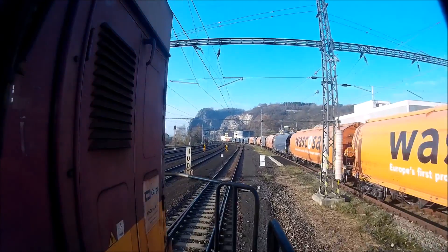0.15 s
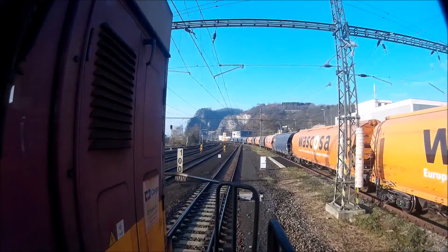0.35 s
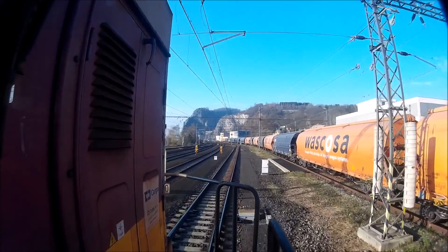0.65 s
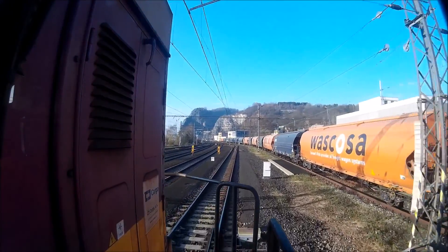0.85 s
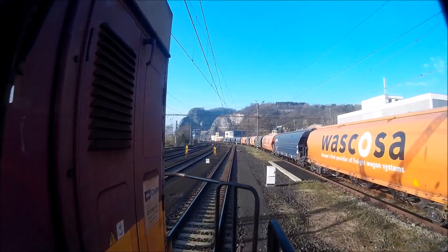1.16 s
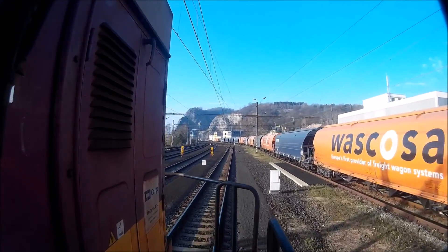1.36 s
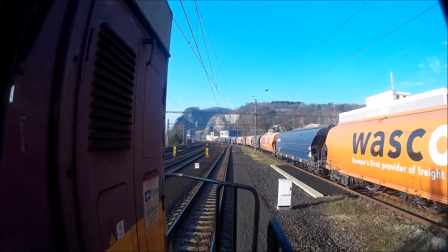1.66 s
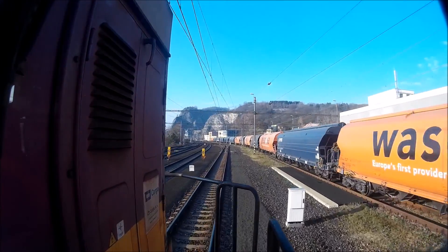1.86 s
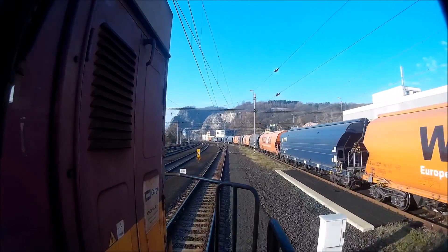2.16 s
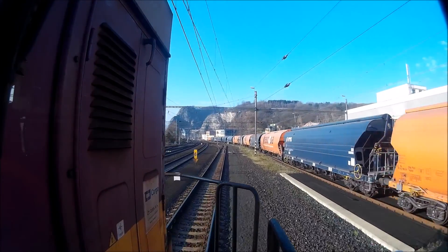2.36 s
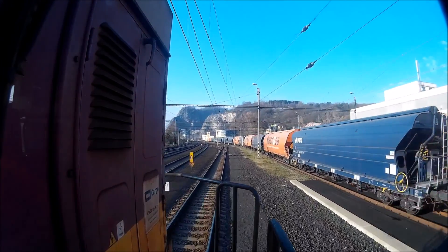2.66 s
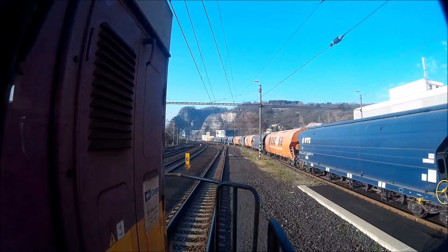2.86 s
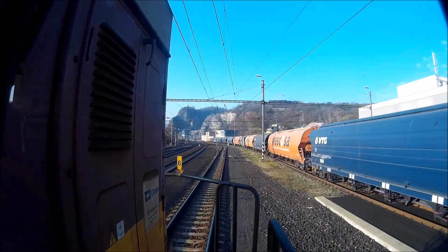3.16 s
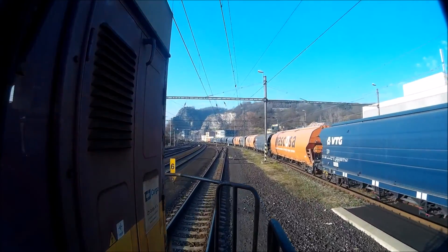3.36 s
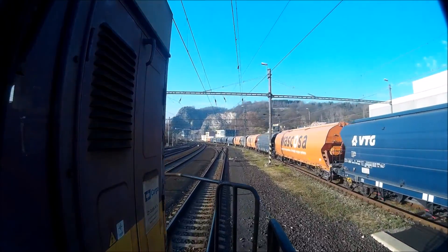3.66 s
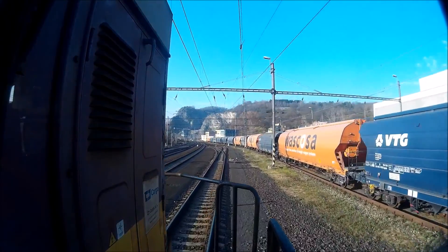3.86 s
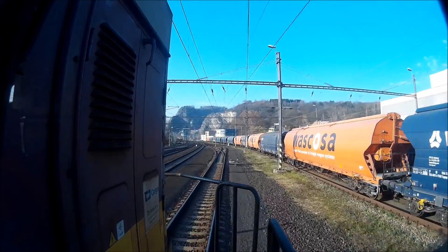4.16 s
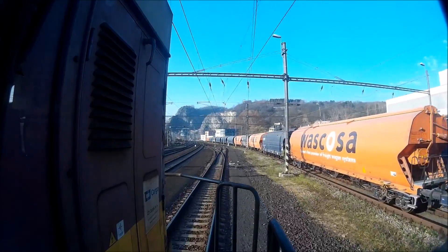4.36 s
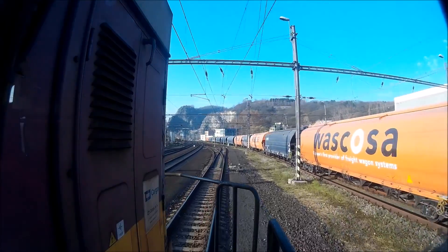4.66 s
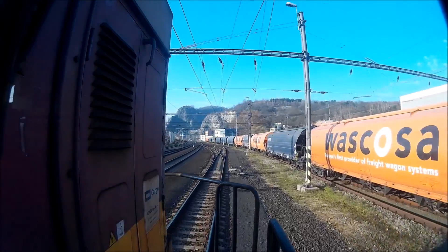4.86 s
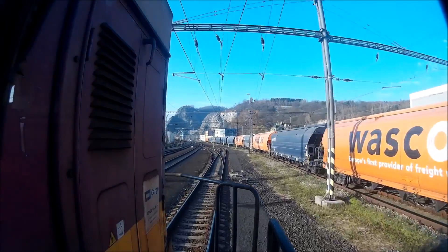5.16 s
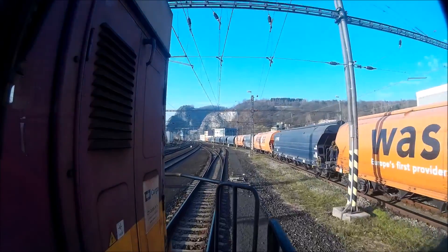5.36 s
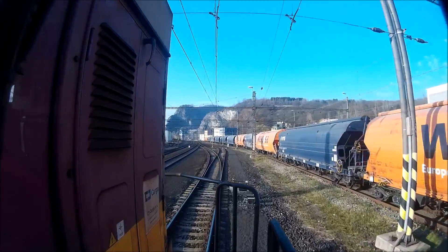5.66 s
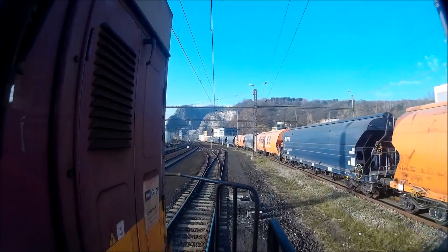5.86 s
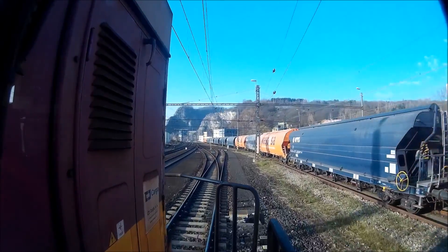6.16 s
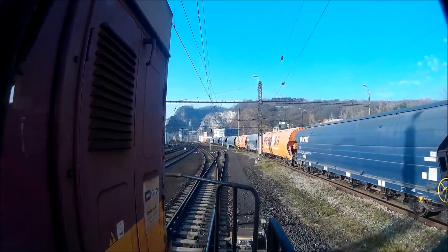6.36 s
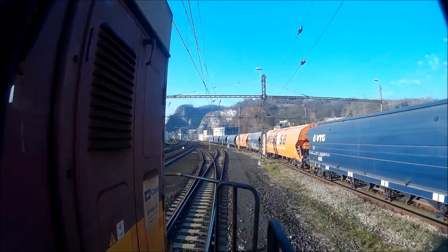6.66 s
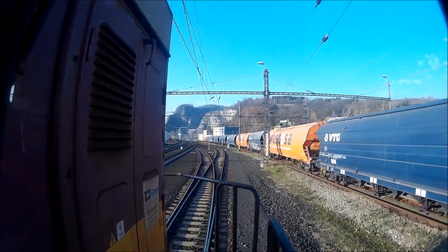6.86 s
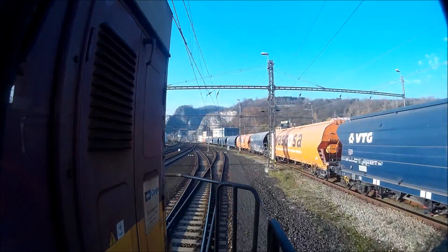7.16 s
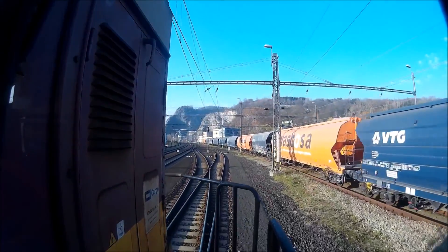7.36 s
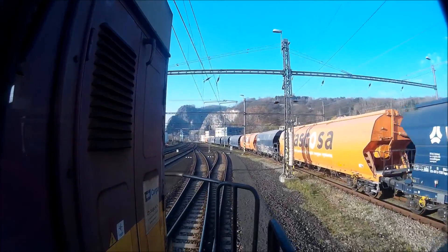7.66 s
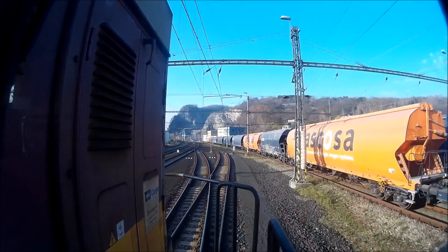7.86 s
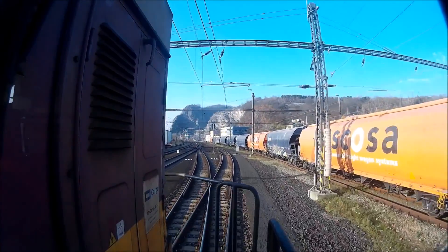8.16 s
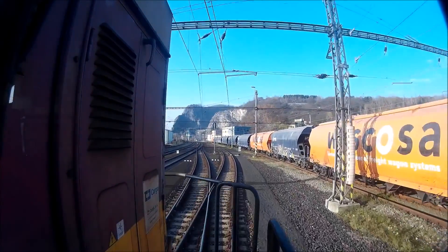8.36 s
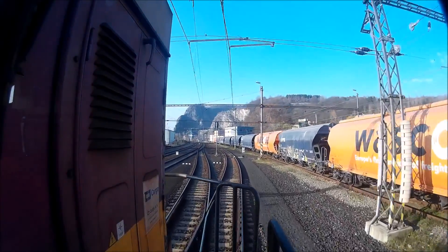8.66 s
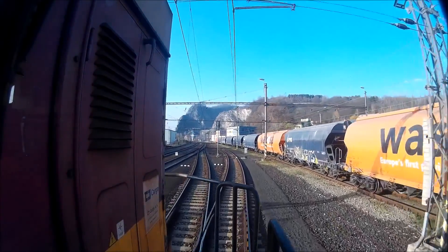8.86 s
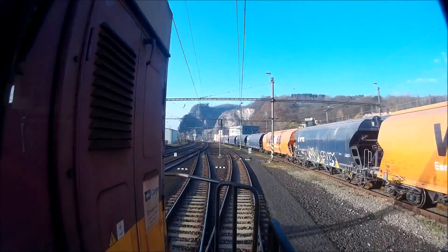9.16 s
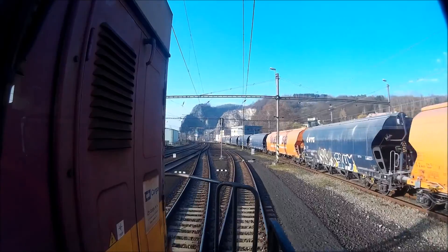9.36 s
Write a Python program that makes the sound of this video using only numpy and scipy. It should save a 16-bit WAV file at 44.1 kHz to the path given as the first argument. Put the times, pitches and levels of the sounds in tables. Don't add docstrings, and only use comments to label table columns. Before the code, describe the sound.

Muffled diesel locomotive drone heard inside a sealed casing, swelling and fluttering with track jolts, with dull rapid knocks, early ticking and faint hiss.

```python
import sys
import numpy as np
from scipy import signal
from scipy.fft import rfft, irfft, next_fast_len
from scipy.io import wavfile
from scipy.ndimage import uniform_filter1d

SR = 44100
rng = np.random.default_rng(int(sys.argv[2]) if len(sys.argv) > 2 else 0)


def materialize(psi):
    bounded = np.clip(np.atleast_2d(psi).T, -1, 1)
    quanta = np.round(bounded * 32767).astype(np.int16)
    wavfile.write(sys.argv[1], SR, quanta)


def amplitude_ratio(level_db):
    exponent = np.asarray(level_db, float) / 20
    return 10 ** exponent


N = 420273
TIME = np.arange(N) / SR

# [start t/s, length/s, level/dB, f/Hz]
TRACK_JOLTS = [(0.065, 0.015, -38, 194.8), (0.111, 0.037, -29, 196), (0.193, 0.034, -34, 193),
               (0.24, 0.028, -31, 190.7), (0.287, 0.086, -38, 191.2), (0.396, 0.019, -33, 191),
               (0.435, 0.033, -37, 187.2), (0.541, 0.023, -31, 193.2), (0.632, 0.022, -34.5, 179),
               (0.675, 0.012, -29, 193.1), (0.714, 0.02, -48, 197.2), (0.773, 0.015, -41, 186.3),
               (0.833, 0.042, -32, 184.6), (0.952, 0.05, -28, 194.7), (1.062, 0.015, -30.5, 190.5),
               (1.128, 0.014, -36, 188.3), (1.149, 0.0089, -31, 190), (1.214, 0.022, -34, 195.6),
               (1.27, 0.053, -33, 192), (1.35, 0.022, -34, 205.4), (1.399, 0.021, -36, 185),
               (1.464, 0.019, -44, 180.5), (1.493, 0.039, -30, 183), (1.572, 0.025, -30, 189.6),
               (1.676, 0.021, -33, 191.3), (1.761, 0.011, -32, 186.5), (1.814, 0.018, -34.5, 185),
               (1.892, 0.02, -32, 188.5), (2.039, 0.023, -33, 183.9), (2.108, 0.013, -39, 190),
               (2.145, 0.025, -35, 194), (2.204, 0.016, -31, 194.5), (2.251, 0.02, -36.0, 184),
               (2.394, 0.019, -35.5, 193.3), (2.509, 0.013, -30.5, 194.9), (2.589, 0.017, -36, 190.3),
               (2.606, 0.019, -37.5, 192.9), (2.673, 0.018, -35, 190.2), (2.841, 0.025, -36, 196),
               (2.886, 0.022, -39, 188.6), (3.131, 0.027, -44.5, 186), (3.217, 0.057, -41.5, 194),
               (3.315, 0.025, -38, 188.2), (3.376, 0.03, -38, 200.3), (3.459, 0.019, -37.5, 191.9),
               (3.577, 0.026, -34.5, 199.4), (3.641, 0.021, -49, 178.8), (3.746, 0.024, -30, 193.4),
               (3.838, 0.025, -37, 199.8), (3.961, 0.04, -36, 197.9),
               (4.345, 0.012, -34, 190), (4.509, 0.02, -36, 199), (4.573, 0.029, -35, 194),
               (4.677, 0.037, -34, 200), (4.795, 0.035, -34, 192.3), (4.866, 0.016, -38, 191),
               (4.9, 0.01, -35.5, 182.2), (5.262, 0.015, -33.5, 189.3), (5.375, 0.04, -40, 197.8),
               (5.539, 0.02, -41, 188.8), (5.645, 0.012, -44, 186.1), (5.804, 0.061, -34, 200.9),
               (5.917, 0.025, -44, 198.8), (6.003, 0.053, -34, 192.9), (6.105, 0.034, -34.5, 196),
               (6.215, 0.034, -33.5, 200.5), (6.329, 0.028, -41, 193.9), (6.413, 0.014, -31.5, 184),
               (6.494, 0.019, -40, 187.5), (6.609, 0.039, -33, 192.1), (6.672, 0.033, -35, 197),
               (6.762, 0.0084, -35.5, 195.7), (6.792, 0.029, -35, 200), (6.846, 0.0092, -30.5, 193.4),
               (6.918, 0.029, -43, 195.4), (6.989, 0.033, -35, 197.4), (7.082, 0.045, -28.5, 196),
               (7.164, 0.027, -33.5, 199.1), (7.231, 0.032, -29.5, 196), (7.368, 0.028, -32.5, 197),
               (7.438, 0.012, -30.5, 191.5), (7.664, 0.024, -32.5, 198.6), (7.894, 0.04, -32, 197.8),
               (7.934, 0.022, -32.5, 193.8), (8.077, 0.034, -41, 195.4), (8.115, 0.02, -40, 198.8),
               (8.147, 0.023, -37, 198.3), (8.211, 0.025, -37.5, 184.8), (8.29, 0.033, -38, 196),
               (8.381, 0.043, -35, 194.4), (8.47, 0.026, -38.5, 189.5), (8.594, 0.097, -33, 197.5),
               (8.811, 0.03, -31, 200.8), (8.985, 0.037, -45, 189.3), (9.023, 0.016, -52, 190.4),
               (9.072, 0.047, -29, 200.5), (9.182, 0.037, -31, 195.5), (9.278, 0.035, -29, 197),
               (9.425, 0.023, -33.5, 196), (9.457, 0.0098, -50, 185),
               (0.0, 0.0053, -27, 193.3), (.33, .03, -37, 192), (2.169, .03, -43, 179.6),
          (4.15, .03, -45, 185.3), (5.428, 0.036, -38, 200), (5.489, 0.028, -38, 197.5),
          (6.268, 0.017, -35, 201), (4.052, 0.052, -39, 180), (5.191, 0.039, -42, 191.1),
          (5.96, .04, -40, 196), (6.15, 0.048, -38.5, 196.7), (7.14, .02, -39, 198.4),
          (7.29, 0.049, -41, 197.2), (7.63, 0.031, -35.5, 197.7), (8.755, 0.055, -34.5, 199.2),
          (9.245, .03, -31, 198.2), (9.331, 0.03, -38, 197)]
JOLTS = TRACK_JOLTS
# [t/s, level/dB]
DRIVE = [(0.0, -38), (0.93, -51), (1.14, -52.5), (3.18, -42), (3.4, -45), (4.38, -46), (4.78, -50),
         (5.04, -46.5), (6.13, -38.5), (6.4, -47), (6.82, -42), (7.03, -49), (7.25, -37), (7.67, -50.5),
         (8.65, -41.5), (9.24, -42.5), (9.42, -49), (9.53, -46)]
# [centre t/s, half width/s, depth/dB]
LULLS = [(.48, 0.024, -10.5), (.9, 0.037, -23), (1.43, 0.044, 1), (1.64, 0.022, -11), (1.83, 0.026, -6),
         (1.99, 0.024, -18), (2.31, 0.027, -8), (2.57, 0.022, -21), (2.88, 0.013, -10), (3.02, .015, -8),
         (3.11, .015, -13), (3.35, 0.016, -20), (3.53, .012, -16), (3.69, 0.037, 1), (3.79, 0.014, -18),
         (4.19, 0.099, -21), (4.43, 0.063, -4), (4.76, 0.024, -23), (5.1, 0.098, -4), (5.24, .015, -27),
         (5.72, .02, -12), (5.93, 0.053, -3), (6.31, 0.0098, 5), (6.45, .012, -7), (6.88, 0.0089, -11),
         (6.372, 0.033, -5), (7.05, 0.014, -21), (7.55, 0.053, 2.5), (7.79, 0.068, -16), (8.26, 0.015, -1),
         (8.57, 0.017, -4), (8.725, 0.017, -5), (8.97, 0.036, 1), (9.157, 0.046, 0), (9.235, 0.018, -8),
         (9.38, 0.018, -10)]
# [t/s, level/dB]
SHAFT = [(0.0, -53), (0.13, -47), (0.64, -43), (0.82, -52), (1.38, -45), (1.51, -51), (1.99, -46),
         (2.47, -63), (2.55, -55), (3.05, -49), (3.21, -59), (5.1, -56), (5.31, -46), (6.18, -37),
         (6.82, -37), (7.88, -44), (9.45, -45), (9.53, -49)]
# [t/s, level/dB]
EFFORT = [(0.0, -50), (.75, -51.5), (1.55, -52.5), (1.85, -55), (2.2, -54.5), (2.9, -54.5), (3.2, -57.5),
          (3.8, -54.5), (5.1, -57), (5.8, -56), (6.3, -53.5), (6.75, -55.5), (7.1, -53), (7.6, -54.5),
          (8.0, -53), (8.5, -56), (9.25, -54), (9.53, -55)]
MEAN_EFFORT_DB = -55
# [f/Hz, width/Hz, level/dB]
CASING = [
    (568, 76, -3.5),
    (764, 29, -0.5),
    (854, 70, -2.5),
    (1024, 107, 0.5),
    (1159, 102, 0.5),
    (1296, 76, 2),
    (1620, 108, -1),
    (1790, 123, -1.5),
    (1995, 166, -8.5),
    (2620, 8100, -21.5),
]
# [t/s, extra level/dB, extra level of upper modes/dB]
ODD_KNOCKS = [(.109, -8, 0), (3.122, 0.5, -1), (.611, -7, -9), (.946, -11, 13), (1.448, -3, -4),
              (1.95, 0, 5), (2.117, 3.5, -7), (2.285, 3, -1), (2.452, -0.5, -3), (2.787, -25, 1),
              (3.289, 7.5, -5), (3.959, -1, 6), (4.127, 0, 5), (4.294, 6, -1), (3.792, 2, 3),
              (4.796, -0.5, 4), (5.131, 3.5, -1), (5.299, 7, 1.5), (5.466, 5, 1.5), (5.633, -12, 9),
              (5.968, -2, 7.5), (6.136, -3, -1), (6.973, -9, 17.5), (7.308, -0.5, -2), (7.475, 2, 7),
              (7.643, -2, 11), (7.81, -3, 2), (7.977, -7, 6), (8.145, 1, 2), (8.647, 5, 7.5),
              (8.814, 4.5, -2), (8.982, -19, 14), (9.317, 8.5, -0.5)]
# [t/s, peak level/dB]
CLACKS = [(2.147, -30), (2.023, -48), (2.261, -34), (2.593, -53), (3.333, -53), (3.385, -35.5),
          (3.713, -50), (3.759, -35), (3.843, -55), (4.05, -56), (4.126, -53), (4.261, -43), (4.84, -37),
          (4.875, -38), (6.116, -33), (6.126, -30), (6.221, -44), (6.232, -46), (6.364, -36), (6.558, -41),
          (6.685, -37), (6.727, -42), (7.035, -38), (7.305, -33), (8.25, -34), (7.994, -46), (8.047, -34),
          (8.831, -44), (9.398, -53)]
# [t/s, peak level/dB, brightness/dB]
TICKS = [(0.5901, -31, -27), (0.6305, -36.5, -25), (0.6699, -31, -25), (0.7108, -32, -26),
         (0.7552, -31, -30), (0.7856, -35, -28), (0.7981, -35, -28), (0.842, -35, -29), (0.8809, -37, -32),
         (0.9253, -34, -28), (0.9677, -33, -28), (1.0091, -32, -31), (1.0515, -37, -30),
         (1.0954, -32.5, -28), (1.1344, -41, -30), (1.1787, -34.5, -28), (1.3877, -35, -33),
         (1.4306, -37, -32), (1.4745, -32, -26), (1.515, -35.5, -28), (1.5559, -32, -29),
         (1.5998, -37, -32), (2.528, -40, -45), (2.9108, -37.5, -35), (2.9527, -38, -37), (3.714, -40, -40),
         (3.758, -40, -42)]
# [f/Hz, width/Hz, level/dB, sign]; negative ones ring with the bright edge
TICK_MODES = [
    (750, 300, -9, 1),
    (1060, 330, 0, 1),
    (1800, 650, -6, 1),
    (2800, 800, 1, -1),
    (3850, 450, 3, -1),
]
# [t/s, peak level/dB, f/Hz]
PINGS = [(1.949, -37, 1620), (2.604, -53, 1790), (3.1208, -45, 1758), (3.9579, -45, 1680),
         (4.9621, -46, 1634), (5.9663, -39, 1770), (6.2269, -43, 1596), (6.3018, -53, 1670),
         (6.3876, -41, 1648), (7.0354, -32, 1615), (7.642, -50, 1773), (8.3124, -42, 1718),
         (8.9816, -43, 1750), (9.1506, -49, 1813), (9.2629, -44, 1600),
         (2.148, -40, 1038), (2.616, -42, 1042), (3.122, -45, 880), (3.456, -51, 1350),
             (4.631, -46, 1240), (6.221, -38, 1113), (6.303, -42, 878), (6.364, -42, 1229),
             (8.048, -45, 1249), (8.831, -39, 1100), (9.15, -50, 1130),
         (3.287, -40, 1700), (3.287, -45, 1314), (4.127, -50, 1653), (4.127, -47, 1103),
               (4.293, -49, 1774), (4.296, -51, 1305), (5.13, -46, 1321), (5.297, -36, 1790),
               (5.31, -45, 1303), (5.465, -40, 1313), (6.972, -45, 1780), (7.306, -44, 1242),
               (7.475, -44, 1310), (8.648, -46, 1771), (9.316, -42, 1247)]
# [f/Hz, density/dB per Hz]
RUMBLE = [(8, -14), (38, -8.5), (74, -2.5), (103, -10.5), (125, -8.5), (134, -7), (150, -5), (172, 1.5),
          (200, -5), (235, -9.5), (285, -12), (340, -22), (385, -16), (450, -18), (720, -29.5)]
# [f/Hz, width/Hz, level/dB]
FRAME = [
    (75.5, 6, -15),
    (147, 8, -20),
    (288, 14, -21),
    (500, 40, -23),
]
# [t/s, level/dB]
TRACK = [(0.0, -43), (0.18, -50.5), (1.11, -50), (1.8, -48.5), (1.88, -48), (1.94, -47), (2.63, -51),
         (2.79, -49), (2.84, -50), (3.29, -52.5), (3.87, -44.5), (3.93, -50), (4.19, -51), (4.27, -52),
         (4.59, -47), (5.04, -52), (5.15, -49.5), (9.53, -49)]
# [centre t/s, half width/s, level/dB, f/Hz]
JOINTS = [(1.879, 0.06, -44.5, 75.7), (1.9, .05, -50, 47.97), (2.52, 0.024, -47, 70), (3.73, .05, -44, 45),
          (4.2, 0.13, -57, 60.04), (5.15, .08, -46.5, 75.2), (5.38, 0.073, -48.5, 76.34),
          (5.62, 0.1, -47.5, 75.83), (7.098, 0.065, -46, 66), (7.7, 0.045, -42.5, 62.05),
          (7.93, 0.029, -45, 67.01), (8.94, .03, -42, 60)]
# [f/Hz, width/Hz]
GEARS = [
    (377, 4),
    (397, 3),
]
# [f/Hz, density/dB per Hz]
HISS = [
    (1350, 1),
    (2300, -7),
    (3370, -7.5),
    (5710, -9),
    (14100, -7.5),
    (14900, -9),
    (15500, -13),
]
# [centre t/s, length/s, depth/dB]
DROPOUTS = [(1.652, 0.021, -8), (1.823, 0.024, -19), (2.08, 0.023, -8), (2.305, 0.04, -16),
            (2.741, 0.019, -8), (3.443, 0.018, -8), (4.318, 0.022, -8), (4.449, 0.019, -9),
            (4.553, 0.018, -8), (4.832, 0.021, -8), (4.874, 0.02, -9), (5.537, 0.023, -7),
            (5.578, 0.017, -9), (7.125, 0.042, -14), (7.754, 0.019, -8), (7.883, 0.02, -6),
            (8.009, 0.017, -7), (8.117, 0.02, -10), (8.352, 0.02, -8), (9.014, 0.021, -9)]


def rms_one(x):
    return x / np.sqrt(np.mean(x ** 2) + 1e-20)


def in_time(rows):
    s, level_db = np.transpose(rows)
    return np.interp(TIME, s, level_db)


def drift(rate):
    r = np.exp(-80 * np.pi * rate / SR)
    slow = signal.lfilter([1], [1, -2 * r, r * r], rng.standard_normal(N // 40 + 2002))[2000:]
    return np.interp(np.arange(N) / 40, np.arange(len(slow)), rms_one(slow))


def resonate(x, hz, width_hz):
    r = np.exp(-np.pi * width_hz / SR)
    zeros = np.array([1, 0, -1]) * (1 - r * r) / 2
    poles = [1, -2 * r * np.cos(2 * np.pi * hz / SR), r * r]
    return signal.lfilter(zeros, poles, x + 1e-18)


def butter(x, hz, kind, order):
    return signal.sosfilt(signal.butter(order, hz, kind, fs=SR, output="sos"), x)


def coloured(spectrum):
    hz, level_db = np.transpose(spectrum)
    size = next_fast_len(N)
    grid = np.maximum(np.arange(size // 2 + 1) * SR / size, 1)
    shape = amplitude_ratio(np.interp(np.log(grid), np.log(hz), level_db, left=-80, right=-80))
    return rms_one(irfft(rfft(rng.standard_normal(size)) * shape, size)[:N])


def impulses(s, gain):
    out = np.zeros(N)
    np.add.at(out, np.minimum((np.asarray(s) * SR).astype(int), N - 1), gain)
    return out


def around(s, before, after):
    return slice(max(int((s - before) * SR), 0), int((s + after) * SR))


def boom():
    s, length, _, jolt_hz = np.transpose(sorted(JOLTS))
    hz = np.interp(TIME, s + length / 2, jolt_hz) + 2.5 + drift(3.9) + 1.5 * drift(14)
    ringing = np.sqrt(2) * np.cos(2 * np.pi * np.cumsum(hz) / SR)
    rest = amplitude_ratio(3.5 + in_time(DRIVE) + drift(1.5))
    beat_db = 1.5 * np.exp(-TIME / 3.5) * drift(8.2)
    level = np.sqrt((rest * amplitude_ratio(beat_db)) ** 2 + swells() * amplitude_ratio(2 * 0.1 * beat_db)) * amplitude_ratio(lulls())
    run_in = 8192
    shaken = rng.standard_normal(N + run_in)
    shaken = resonate(resonate(shaken, 196, 76), 196, 76)[run_in:]
    shaken = rms_one(butter(shaken, 204, "low", order=6))
    return amplitude_ratio(-4.5) * (level * ringing * amplitude_ratio(drift(24)) + np.sqrt(level * rest) * amplitude_ratio(-13) * shaken)


def swells():
    rise_s, fall_s, gain_db = 0.010, 0.011, 2
    power = np.zeros(N)
    for s, length, level_db, _ in JOLTS:
        near = around(s, 0.1, length + 0.15)
        early = np.maximum(s - TIME[near], 0) / rise_s
        late = np.maximum(TIME[near] - s - length, 0) / fall_s
        power[near] += amplitude_ratio(2 * (level_db + gain_db)) * np.exp(-early ** 2 - late ** 2)
    return power


def lulls():
    dip_db = np.zeros(N)
    for s, width, depth_db in LULLS:
        near = around(s, 0.25, 0.25)
        dip_db[near] += depth_db * np.exp(-((TIME[near] - s) / width) ** 2)
    return dip_db


def shaking_db(housing):
    power = uniform_filter1d(housing ** 2, size=2200) / np.mean(housing ** 2)
    return 10 * np.log10(np.maximum(power, 1e-3))


def shaft():
    return amplitude_ratio(in_time(SHAFT) + 3 + 0.6 * drift(1.6)) * np.sin(2 * np.pi * 25 * TIME)


def casing(shake, upper):
    out = 0
    for k, (hz, width_hz, level_db) in enumerate(CASING):
        drive = upper if k > 5 else shake
        out = out + (-1) ** k * amplitude_ratio(level_db) * resonate(drive, hz, width_hz)
    return butter(butter(out, 2260, "low", order=4), 310, "high", order=2)


def knock_rows():
    first_s, cycle_s = 0.109, 0.16743
    s = np.arange(first_s, N / SR, cycle_s)
    chance = rng.standard_normal((len(s), 2))
    extra = np.zeros((len(s), 2))
    for odd_s, extra_db, extra_upper_db in ODD_KNOCKS:
        k = np.argmin(np.abs(s - odd_s))
        extra[k], chance[k] = (extra_db, extra_upper_db), 0
    swing_db = np.interp(s, *np.transpose(EFFORT)) - MEAN_EFFORT_DB
    level_db = -47 + swing_db - chance[:, 0] + extra[:, 0]
    upper_db = -5.5 - 7.5 * chance[:, 1] + extra[:, 1]
    return s, level_db, upper_db


def knocks():
    t = np.arange(int(0.06 * SR)) / SR
    blow = np.exp(-t / 0.0063) * np.minimum(t / 0.0008, 1)
    rebound = (t > 0.015) * np.exp(-np.abs(t - 0.015) / 0.021)
    snap = np.exp(-t / 0.003)
    s, level_db, upper_db = knock_rows()
    s = s - 0.003
    s_clack, clack_db = np.transpose(CLACKS)
    stray = signal.fftconvolve(impulses(s_clack, amplitude_ratio(clack_db + 5)), snap)[:N]
    lower = signal.fftconvolve(impulses(s, amplitude_ratio(level_db + 17)), blow + 0.27 * rebound)[:N]
    lower = lower + amplitude_ratio(1.0) * stray
    upper = signal.fftconvolve(impulses(s, amplitude_ratio(level_db + upper_db + 20.5)), blow + 0.35 * rebound)[:N]
    upper = upper + stray
    noise = rng.standard_normal(N)
    thud = amplitude_ratio(-5.5) * resonate(resonate(lower * noise, 503, 480), 503, 480)
    return thud + butter(casing(lower * noise, upper * noise), 2050, "low", order=6)


def clatter(level_db):
    sizes = amplitude_ratio(1.6 * np.minimum(rng.exponential(1, N), 5)) * rng.choice([-1, 1], N)
    grains = rms_one(sizes * (rng.random(N) < 900 / SR))
    clumps = amplitude_ratio(0.7 * drift(11) + 1.54 * drift(17))
    shake = (rng.standard_normal(N) + 0.74 * grains) * clumps
    return amplitude_ratio(level_db - 1) * rms_one(casing(shake, shake))


def ticks():
    s, level_db, bright_db = np.transpose(TICKS)
    s = s + 0.0007
    bright_db = np.minimum(bright_db, -25)
    blow_db = 1.15 * (level_db + 31) - 3
    tap = butter(impulses(s - 0.0002, -amplitude_ratio(blow_db)), 2050, "low", order=6)
    edge = impulses(s, -amplitude_ratio(blow_db + bright_db - 2))
    ring = np.zeros(N)
    for hz, width_hz, mode_db, sign in TICK_MODES:
        ring += sign * amplitude_ratio(mode_db) * resonate(tap if sign > 0 else edge, hz, width_hz)
    leak = np.exp(-2 * np.pi * 450 / SR)
    return signal.lfilter([-leak, 1], [1, -leak], butter(ring, 4200, "low", order=8))


def pings():
    t, out = np.arange(int(0.05 * SR)) / SR, np.zeros(N)
    rise_s, fall_s, gain_db = 0.0011, 0.0059, -2.5
    shape = (1 - np.exp(-t / rise_s)) * np.exp(-t / fall_s)
    for s, level_db, hz in PINGS:
        i = int(s * SR)
        out[i:i + len(t)] += amplitude_ratio(level_db + gain_db) * shape * np.sin(2 * np.pi * hz * t)
    return out


def rumble(swing_db):
    frame_db = -53.5 + 0.98 * swing_db + 1.5 * drift(21.4)
    wheels_db = in_time(TRACK) - 0.5 + 0.6 * drift(3)
    noise = coloured(RUMBLE)
    for hz, width_hz, mode_db in FRAME:
        noise = noise + amplitude_ratio(mode_db - 0.5) * rms_one(resonate(rng.standard_normal(N), hz, width_hz))
    low = butter(noise, 145.5, "low", order=4)
    high = butter(noise, 141, "high", order=4)
    lumps = amplitude_ratio(drift(9))
    return lumps * (amplitude_ratio(frame_db + 9) * high + amplitude_ratio(wheels_db + 4.5) * low)


def joints():
    out = np.zeros(N)
    for s, width, level_db, hz in JOINTS:
        near = around(s, 0.3, 0.3)
        t = TIME[near] - s
        out[near] += amplitude_ratio(level_db) * np.exp(-(t / width) ** 2) * np.sin(2 * np.pi * hz * t)
    return out


def fan():
    from_s, to_s, from_hz, to_hz = 3.6, 4.3, 30, 27.64
    way = np.clip((TIME - from_s) / (to_s - from_s), 0, 1)
    hz = from_hz + (to_hz - from_hz) * way
    return amplitude_ratio(-49) * np.sin(np.pi * way) * np.sin(2 * np.pi * np.cumsum(hz) / SR)


def gears(swing_db):
    level_db = -60.5 + 0.54 * swing_db + 2.5 * drift(0.82)
    level_db = level_db + 6.5 * np.exp(-((TIME - 2.92) / 0.84) ** 2)
    pair = np.zeros(N)
    for hz, width_hz in GEARS:
        narrow = resonate(rng.standard_normal(N), hz, width_hz)
        pair += rms_one(resonate(narrow, hz, 2 * width_hz))
    return amplitude_ratio(level_db - 9) * pair


def buzz(shaken_db):
    noise = butter(butter(rng.standard_normal(N), 2270, "high", order=4), 6000, "low", order=2)
    return amplitude_ratio(-77.5 + 0.78 * shaken_db) * rms_one(noise)


def hiss():
    return amplitude_ratio(-69.5) * coloured(HISS) + amplitude_ratio(-93.5) * np.sin(2 * np.pi * 9525.5 * TIME)


def scene():
    effort_db = in_time(EFFORT)
    swing_db = effort_db - MEAN_EFFORT_DB
    housing = boom() + shaft() + rumble(swing_db) + gears(swing_db) + joints() + fan()
    shaken_db = shaking_db(housing)
    clatter_db = effort_db + 0.8 * drift(8) + 0.38 * (shaken_db - shaken_db.mean())
    return (housing + clatter(clatter_db) + knocks() + ticks() + pings() + buzz(shaken_db))[None]


def treble_gaps(sound):
    treble = signal.sosfiltfilt(signal.butter(8, 2120, "high", fs=SR, output="sos"), sound)
    lost, spared = np.zeros(N), np.zeros(N)
    for s, length, depth_db in DROPOUTS:
        lines_hz = rng.uniform(2300, 15000, 4)
        near = around(s, 0.03, 0.03)
        t = TIME[near] - s
        hollow = np.exp(-(np.abs(t) / (0.5 * length - 0.0015)) ** (100 * length))
        lost[near] = np.maximum(lost[near], (1 - amplitude_ratio(3 * depth_db)) * hollow)
        swell = np.cos(np.pi * t / 0.06) ** 2
        lines = np.sin(2 * np.pi * lines_hz[:, None] * TIME[near]).sum(axis=0)
        spared[near] += amplitude_ratio(-82.5) * swell * lines
    return sound - lost * treble + spared


def low_pass(x):
    return signal.sosfilt(signal.butter(12, 15710, fs=SR, output="sos"), x)


def record(dry):
    mix = treble_gaps(dry + hiss())
    return low_pass(mix)


dry = scene()
out = record(dry)
materialize(out)
```